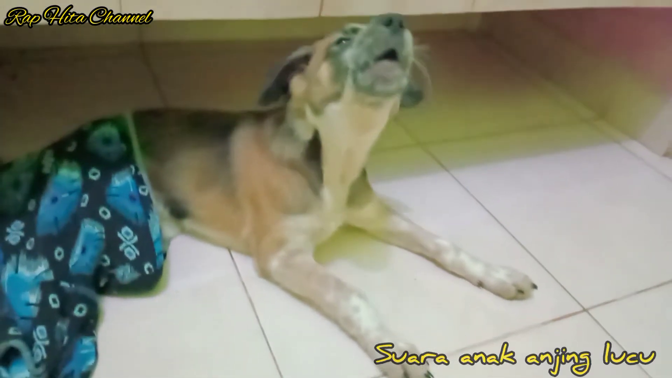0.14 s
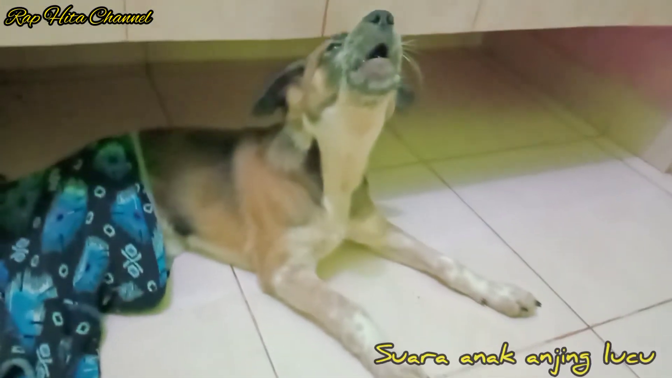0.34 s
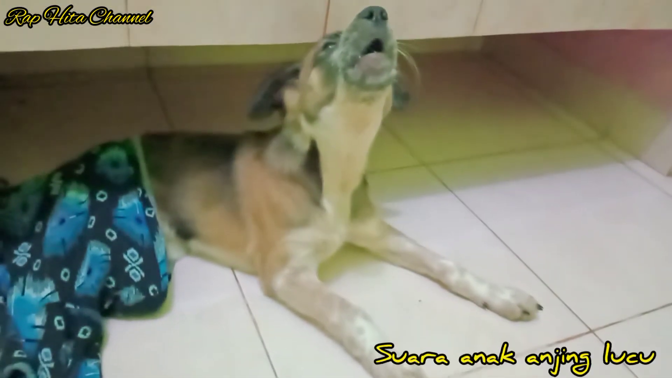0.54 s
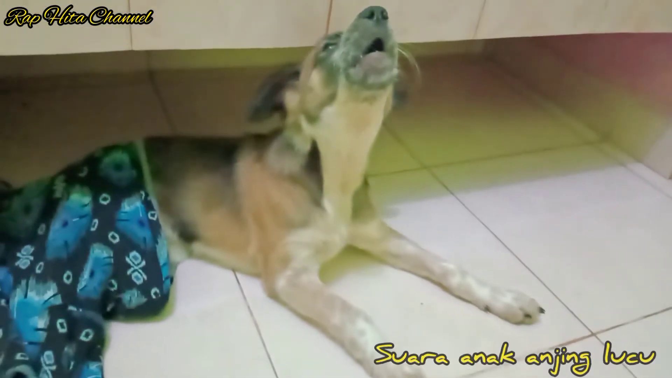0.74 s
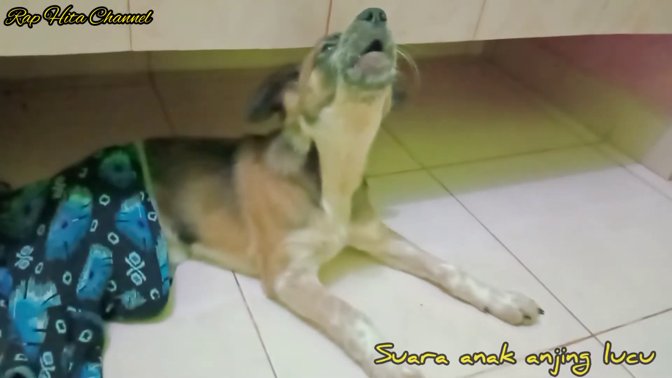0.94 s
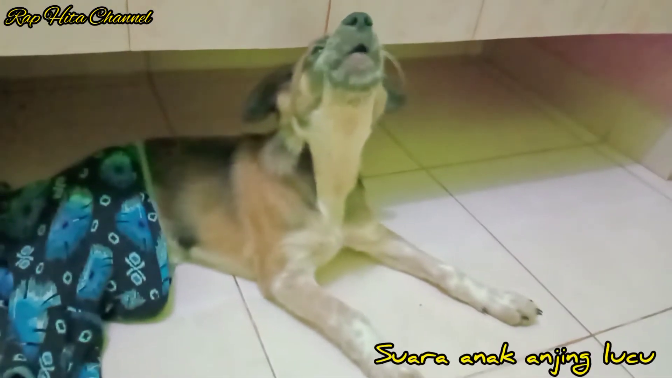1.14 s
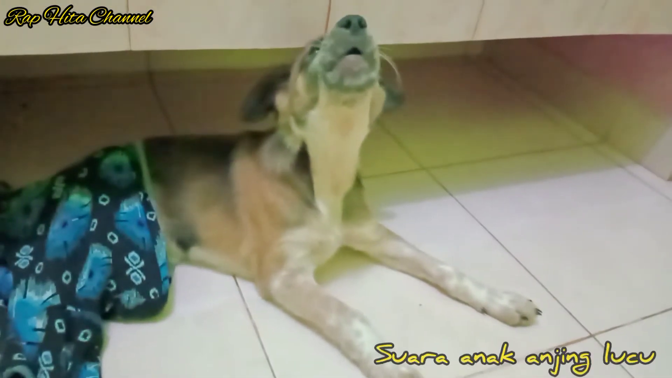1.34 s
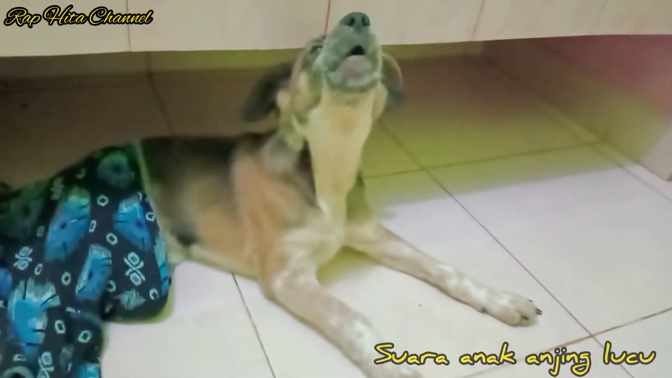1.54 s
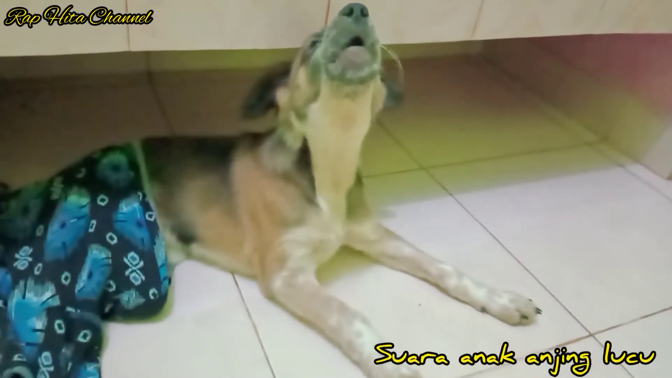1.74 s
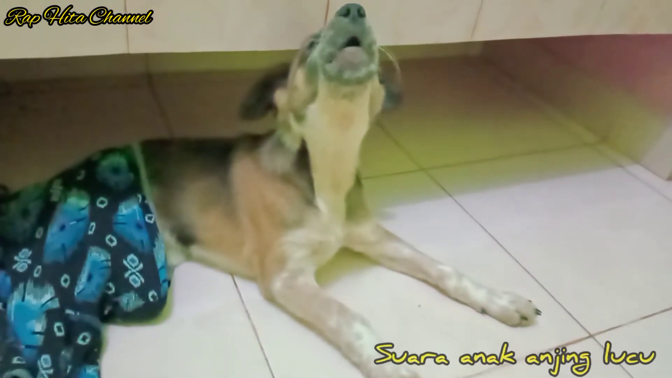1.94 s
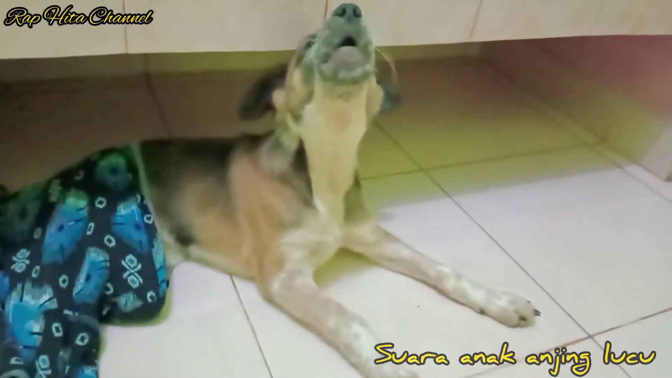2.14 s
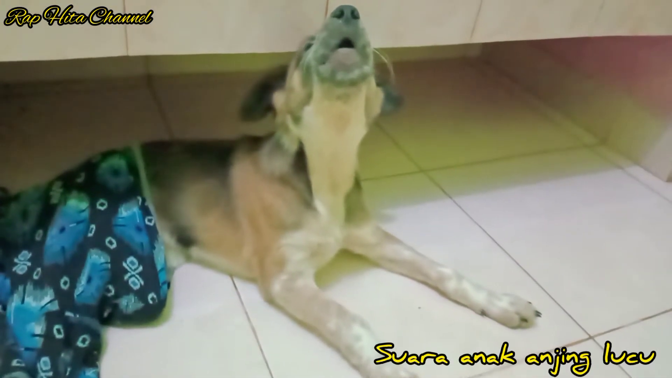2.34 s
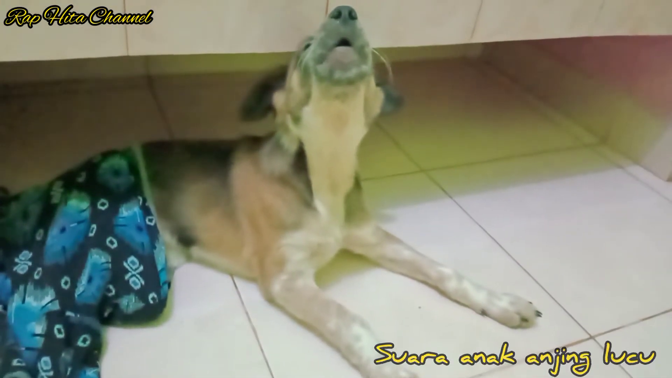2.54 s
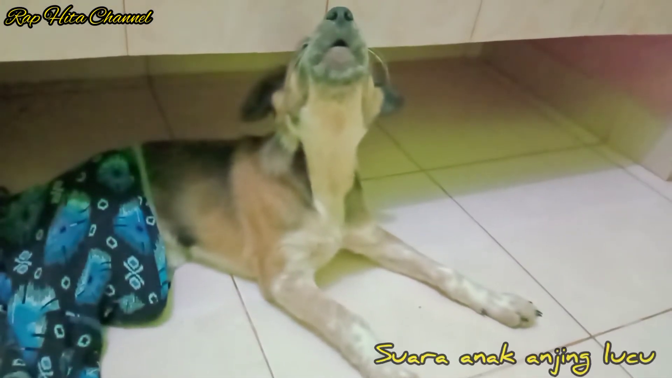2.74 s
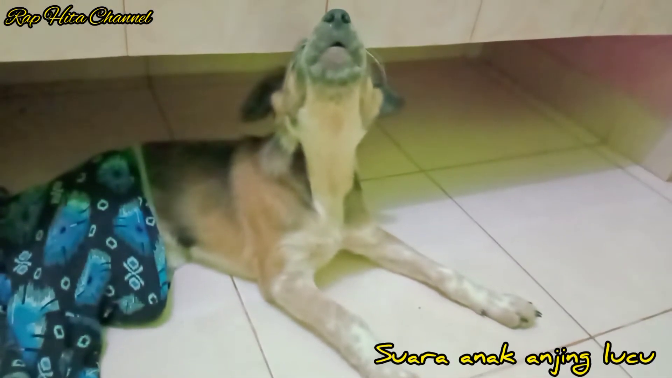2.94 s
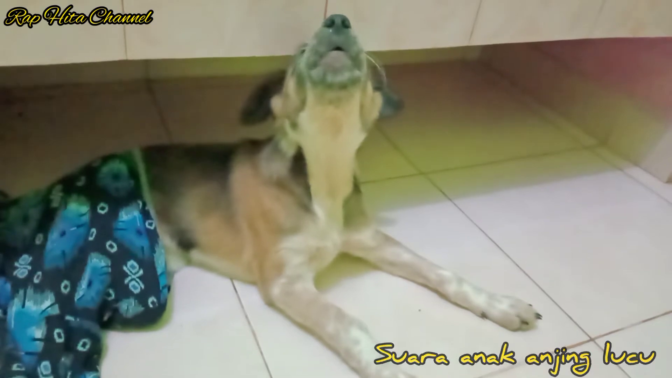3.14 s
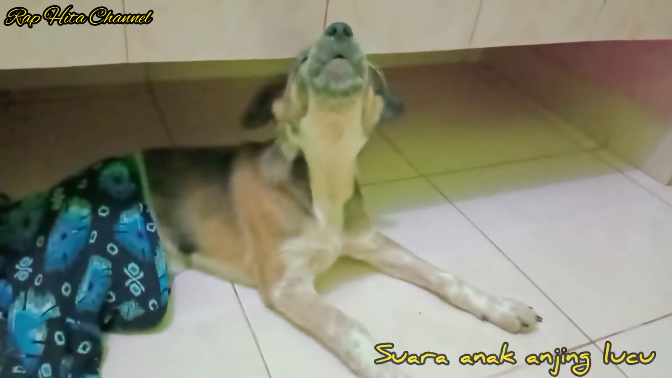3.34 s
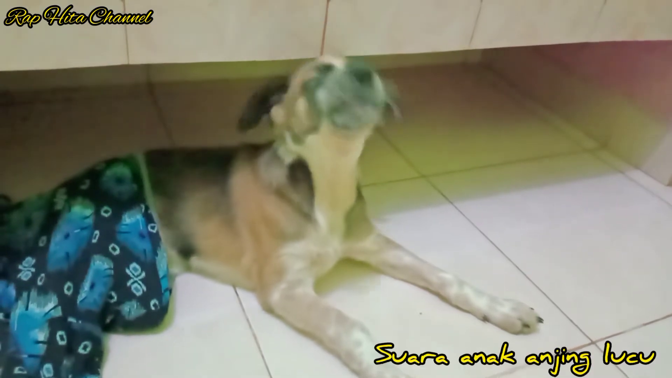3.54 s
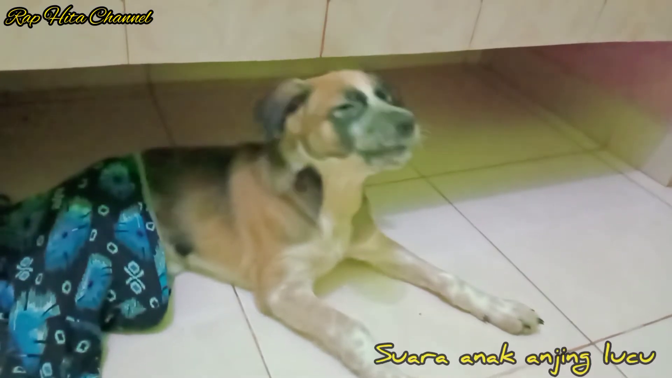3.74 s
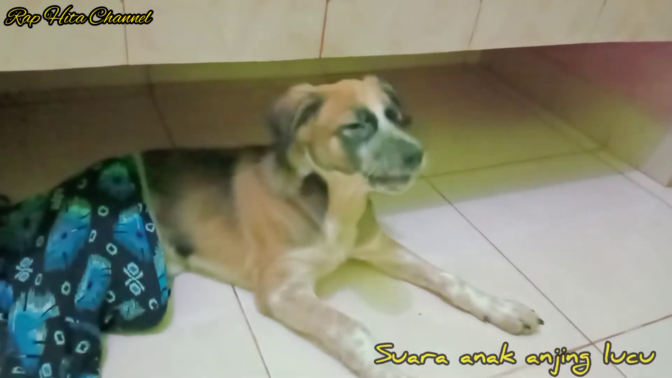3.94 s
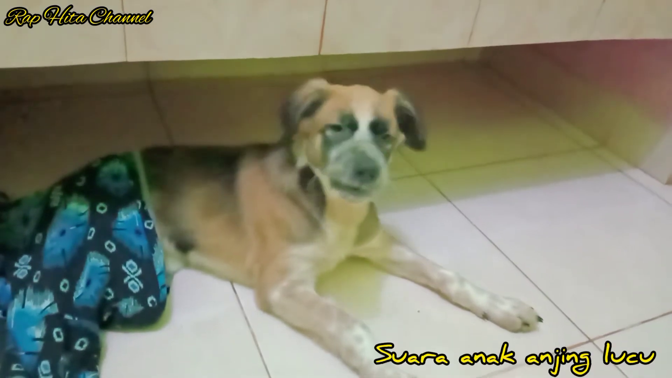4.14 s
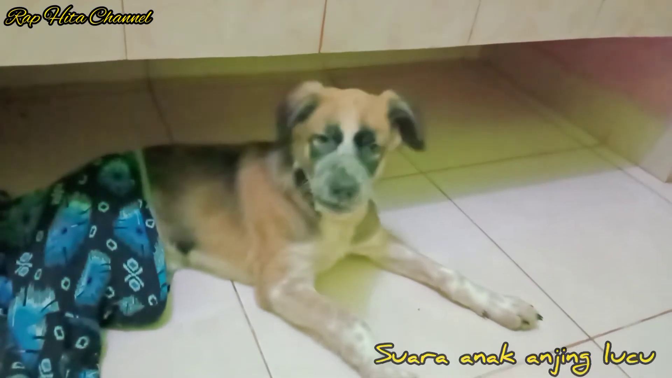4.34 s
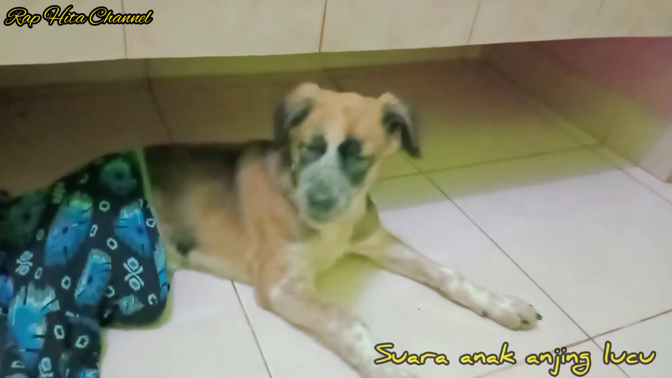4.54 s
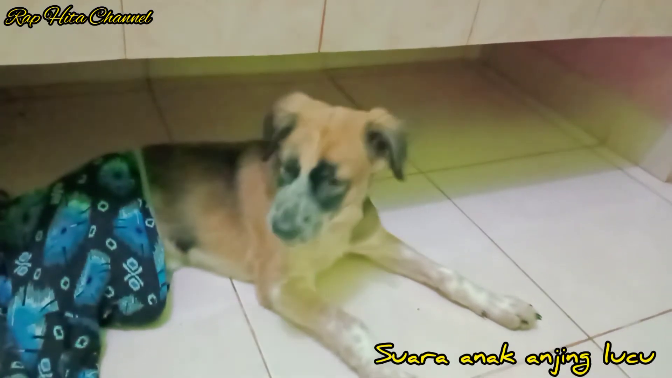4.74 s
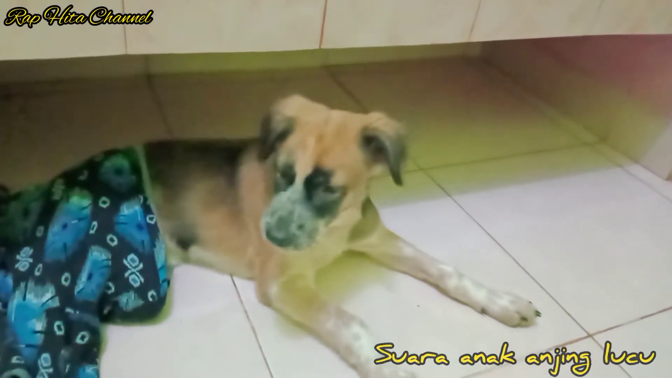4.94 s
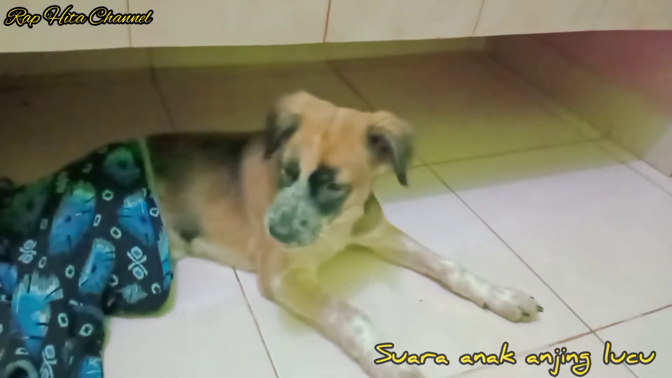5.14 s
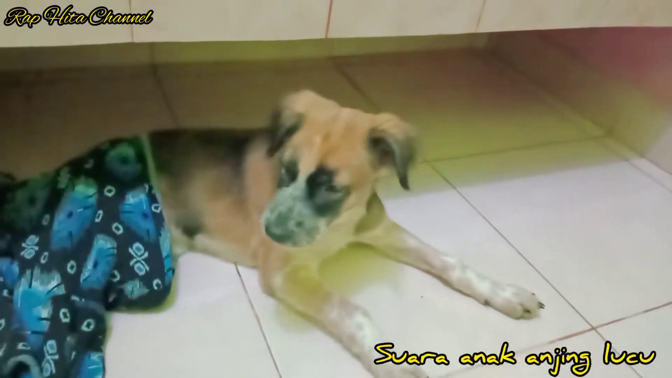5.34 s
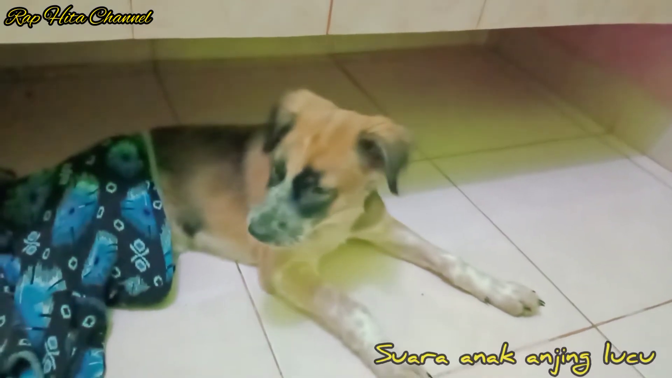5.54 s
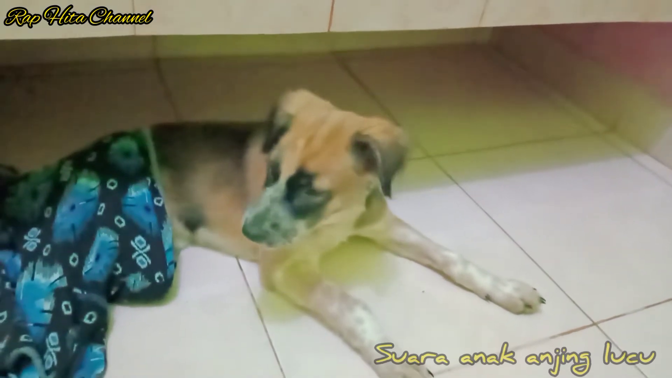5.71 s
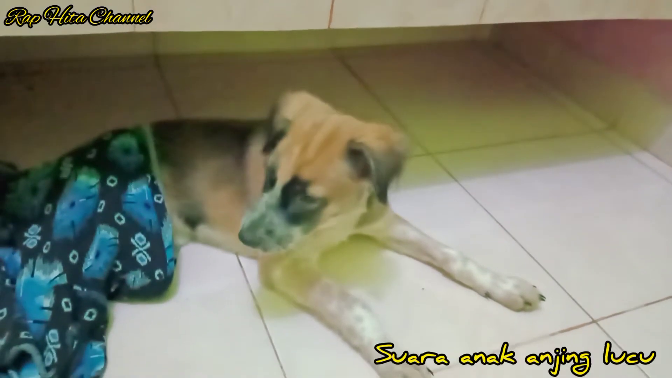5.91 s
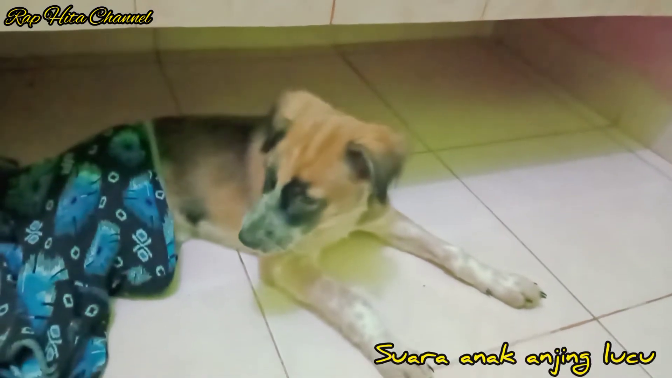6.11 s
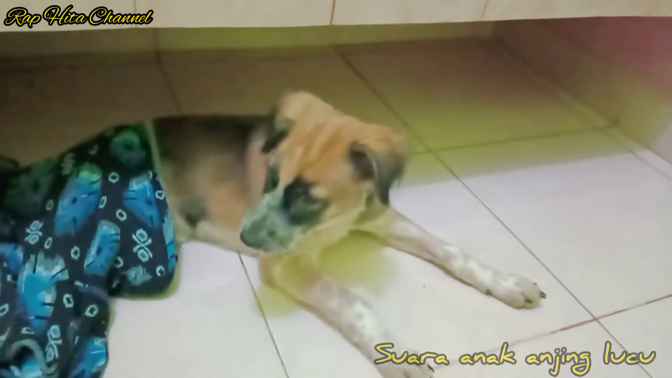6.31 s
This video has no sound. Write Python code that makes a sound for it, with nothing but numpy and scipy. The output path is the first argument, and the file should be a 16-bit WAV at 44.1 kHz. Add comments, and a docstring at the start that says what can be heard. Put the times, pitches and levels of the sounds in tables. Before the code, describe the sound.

A puppy howls close by in a hard tiled room that rings briefly after each cry. The first howl starts at once, high, and falls away by 0.4 seconds. A long second howl begins at about 0.7 seconds, climbs to a peak near 1.1, then sinks in small steps, cracks hoarsely around 2.4 and ends low at 2.8. Four softer nasal whines follow, each falling in pitch and led in by a thin, very high whistle: a wavering one from 3.2 to 3.7 seconds, two short ones at about 4.1 and 4.6, and one from 5.1 to 5.6 with a stronger whistle. At about 5.8 seconds another whistle opens a new high, wavering howl that is still going at 6.4 seconds. A faint fan-like hum, soft room noise and a slight low rumble lie underneath.

```python
"""A puppy howls twice on a tiled floor, gives four falling whines and starts a new howl.
Its vocal folds buzz through the open mouth for the howls and through the nose for the soft whines.
A thin throat whistle leads into each whine and the last howl, and the voice splits it into side tones.
The hard room rings over a faint hum; a gain control pushes the background down under the howls."""
import sys
import numpy as np
from scipy import signal
from scipy.fft import rfft, irfft, next_fast_len
from scipy.io import wavfile
from scipy.ndimage import uniform_filter1d, minimum_filter1d

SR = 44100
rng = np.random.default_rng(int(sys.argv[2]) if len(sys.argv) > 2 else 0)


def generate_wav(signal):
    """Clip the signal to [-1, 1] and save it as 16-bit WAV at the path in sys.argv[1]."""
    frames = np.transpose(np.atleast_2d(signal))
    scaled = np.clip(frames, -1, 1) * 32767
    pcm = np.round(scaled).astype(np.int16)
    wavfile.write(sys.argv[1], SR, pcm)


N = 280917
T = np.arange(N) / SR


def amp(db):
    """Decibels to gain."""
    return 10 ** (np.asarray(db) / 20)


def unit_rms(x):
    """Scales to rms 1."""
    return x / np.sqrt(np.mean(x ** 2) + 1e-20)


def at_hz(points, hz):
    """Reads a table along a logarithmic frequency axis."""
    f, value = np.transpose(points)
    return np.interp(np.log(hz + 1), np.log(f + 1), value)


def curves(rows, t):
    """The columns of a breakpoint table at the given times."""
    times, *columns = np.transpose(rows)
    return [np.interp(t, times, column) for column in columns]


def noise(colour):
    """Noise of rms 1 with the given colour."""
    size = next_fast_len(N)
    gain = amp(at_hz(colour, np.fft.rfftfreq(size, 1 / SR)))
    return unit_rms(irfft(rfft(rng.standard_normal(size)) * gain, size)[:N])


def drift(rate_hz):
    """Smooth random wander of rms 1, up to about the given rate."""
    size = next_fast_len(N // 16)
    hz = np.fft.rfftfreq(size, T[-1] / size)
    slow = irfft(rfft(rng.standard_normal(size)) * np.exp(-(hz / rate_hz) ** 2), size)
    return unit_rms(np.interp(T, np.linspace(0, T[-1], size), slow))


def soft_gate(start, end, rise_s=0.0084, fall_s=0.01):
    """The sample indices between two times and a soft-edged gate over them."""
    at = np.flatnonzero((T >= start) & (T <= end))
    ramp = np.clip(np.minimum((T[at] - start) / rise_s, (end - T[at]) / fall_s), 0, 1)
    return at, np.sin(np.pi / 2 * ramp) ** 2


# Colour of the room tone. Each row: frequency in Hz, relative level in dB.
ROOM_TONE_COLOUR = [(25, -31.5), (50, -22), (90, -10), (160, 0.5), (280, -2.5), (450, -5), (1000, -6.5),
                    (2000, -12.5), (3400, -16), (4300, -27.5), (5300, -41.5), (8000, -46), (15000, -54)]


def room_tone(level_db=-46.5):
    """A soft, dark bed of steady noise."""
    return amp(level_db) * noise(ROOM_TONE_COLOUR)


# Colour of the rumble. Each row: frequency in Hz, relative level in dB.
RUMBLE_COLOUR = [(20, -11.5), (42, -4), (60, -11), (80, 7), (130, -19), (300, -38.5), (1000, -76)]
# Its fade-in. Each row: time in seconds, level in dB.
RUMBLE_FADE = [(0, -85), (1.8, -68), (2.5, -64), (6.37, -61.5)]


def house_rumble(swell_db=4.5):
    """The low rumble of the house creeps in with lumpy swells."""
    return amp(curves(RUMBLE_FADE, T)[0] + swell_db * drift(8)) * noise(RUMBLE_COLOUR)


# Partials of the hum. Each row: frequency in Hz, rms level in dB.
HUM_PARTIALS = [(100, -66.5), (149, -60.5), (248, -53), (300, -56), (395, -72.5)]


def hum(waver_db=1.5):
    """A faint hum, as of a fan; each partial wavers in level and phase."""
    return np.sqrt(2) * sum(amp(db + waver_db * drift(6.5)) * np.sin(2 * np.pi * hz * T + .5 * drift(11))
                            for hz, db in HUM_PARTIALS)


# Slaps off floor and walls. Each row: delay in seconds, level in dB against the direct sound.
EARLY_REFLECTIONS = [(.0034, -22.5), (.0112, -14.5), (.0187, -14), (.0265, -13)]
# Ring of the room. Each row: frequency in Hz, seconds to die by 60 dB.
RING_TIMES = [(250, .8), (600, 0.67), (1800, 0.75), (3500, 0.62), (7000, 0.6), (14000, 0.25)]


def tiled_room(x, tail_db=-5.5, predelay_s=0.0097):
    """Direct sound, a few hard reflections, then a dense tail that dies band by band."""
    slots = np.arange(0, SR - 12, 12)  # one echo of random sign somewhere in each slot
    echoes = np.zeros(SR)
    echoes[slots + rng.integers(0, 12, len(slots))] = rng.choice([-1., 1.], len(slots))
    hz, t, bands = signal.stft(echoes * (T[:SR] > predelay_s), SR, nperseg=256)
    decay = amp(-60 * t / at_hz(RING_TIMES, hz)[:, None])
    tail = signal.istft(bands * decay, SR, nperseg=256)[1]
    response = amp(tail_db) * tail / np.linalg.norm(tail)
    response[0] += 1
    for delay, db in EARLY_REFLECTIONS:
        response[round(delay * SR)] += amp(db)
    return signal.fftconvolve(x, response)[:N]


# Colour of the rasp. Each row: frequency in Hz, relative level in dB.
RASP_COLOUR = [(500, -15.5), (1700, -4.5), (2650, 0.5), (3500, 7.5), (4500, -17), (5900, -38.5),
               (8200, -14.5), (9900, -23), (12300, -16), (15000, -26.5)]


def rasp(voice, folds, clear_db=-48, hoarse_boost_db=20, pulsing=0.53):
    """Turbulence at the folds rides the voice's level, pulses at its pitch and grows with hoarseness."""
    envelope = np.sqrt(abs(uniform_filter1d(voice ** 2, size=400)))
    _, hoarse = opening_and_hoarseness(T)
    gain = amp(clear_db + hoarse_boost_db * hoarse) * envelope
    return gain * (1 + pulsing * folds.real) * noise(RASP_COLOUR)


# Side tones of the whistle, then of its octave.
# Each row: offset in multiples of the voice pitch, relative level in dB.
WHISTLE_SIDEBANDS = [(-1, -13), (1, 9.5), (2, -2.5), (3, -14)]
OCTAVE_SIDEBANDS = [(-4, -15.5), (-3, -22), (-2, -14.5), (-1, -17.5), (1, -14.5), (2, -19.5), (3, -21)]


def side_tones(swing):
    """The folds' swing modulates the whistle and its octave: one modulator for each."""
    return [abs(swing) * sum(amp(db) * np.exp(1j * round(k) * np.angle(swing)) for k, db in table)
            for table in (WHISTLE_SIDEBANDS, OCTAVE_SIDEBANDS)]


# Colour of the air around the whistle. Each row: frequency in Hz, relative level in dB.
AIR_COLOUR = [(1500, 5), (3400, 20), (4500, 13), (5500, -15), (6800, 5.5), (8200, 5), (9300, -11),
              (11000, -2.5), (12500, 2), (15500, -16.5)]
# Narrow resonance that the octave meets. Each row: frequency in Hz, level in dB against the whistle.
OCTAVE_RESONANCE = [(11600, -25), (12100, -3), (12500, -29.5), (12900, -29.5), (14000, -55)]
# Whistle cues. Each row: start, crest and end in seconds, pitch in Hz, arch as a share of the pitch,
# relative crest level in dB, swell in dB, fade in dB per second, relative side-tone and air levels in dB.
WHISTLE_CUES = [(3.18, 3.255, 3.68, 6214, 0.021, -44.5, 19, 50, -59, -57),
                (4.064, 4.156, 4.24, 6030, 0.017, -49.5, 6, 400, -73, -61),
                (4.546, 4.63, 4.88, 6010, 0.0096, -48.5, 7.5, 257, -77.5, -60.5),
                (5.074, 5.159, 5.41, 6383, 0.036, -29.5, 18.5, 163, -55.5, -69.5),
                (5.746, 5.776, 6, 6553, 0.07, -35, -4.5, 98, -52.5, -62)]


def throat_whistle(cue, folds, tone_trim_db=2.5, side_trim_db=-3.5, air_trim_db=14.5, unsteady_db=5.0,
                   scoop=0.021, scoop_s=.014, arch_s=0.017, waver=0.0034, jitter=0.0057, air_db_per_s=30):
    """A second, very high oscillator scoops up, arches over its crest and fades as its air thins out."""
    start, crest, end, pitch_hz, arch, crest_db, swell_db, fade_db_per_s, side_db, air_db = cue
    at, gate = soft_gate(start, end, fall_s=0.047)
    t, swing = T[at], folds[at]
    below_crest_db = swell_db * np.maximum(crest - t, 0) / (crest - start)
    below_crest_db += fade_db_per_s * np.maximum(t - crest, 0)
    level = amp(crest_db + tone_trim_db - below_crest_db + unsteady_db * drift(25)[at])
    bend = 1 - scoop * np.exp((start - t) / scoop_s) + arch * np.exp(-((t - crest) / arch_s) ** 2)
    hz = pitch_hz * bend * (1 + waver * drift(49)[at] + jitter * drift(720)[at])
    carrier = np.exp(2j * np.pi * np.cumsum(hz) / SR)
    depth = amp(side_db + side_trim_db)
    tone_sides, octave_sides = side_tones(swing)
    tone = carrier * (level + depth * tone_sides)
    octave = carrier ** 2 * (level * amp(at_hz(OCTAVE_RESONANCE, 2 * hz)) + depth * octave_sides)
    air_level = amp(air_db + air_trim_db - air_db_per_s * (t - start))
    hiss = air_level * noise(AIR_COLOUR)[at] * (1 + 0.29 * swing.real)
    return at, gate * (np.sqrt(2) * (tone + octave).real + hiss)


# Movement of the mouth. Each row: time in seconds, opening from 0 (shut) to 1 (wide).
MOUTH_OPENING = [(0, 1), (.37, 0.93), (.74, 0.88), (1.1, 0.96), (1.9, 1), (2.27, 0.94), (2.5, 0.64),
                 (2.8, 0.33), (3.2, 0.01), (5.56, 0.1), (5.78, 0), (5.9, 0.51), (6.12, 0.75), (6.25, 0.64),
                 (6.37, 1)]
# One crack as the long howl drops to its low ending: time and half length in seconds, added hoarseness.
VOICE_CRACK = (2.37, 0.13, 1)


def opening_and_hoarseness(t, hoarse_open=0.26, hoarse_shut=.36):
    """The wider the mouth, the clearer the voice, except where it cracks; both run from 0 to 1."""
    opening = np.clip(curves(MOUTH_OPENING, t)[0], 0, 1)
    crack_s, width_s, added = VOICE_CRACK
    crack = added * np.exp(-((t - crack_s) / width_s) ** 2)
    hoarse = hoarse_shut + (hoarse_open - hoarse_shut) * opening + crack
    return opening, np.clip(hoarse, 0, 1)


# The long howl steps down through small register breaks.
# Each row: time in seconds, drop as a share of the pitch, flash of the low overtones in dB.
REGISTER_BREAKS = [(1.306, 0.041, 5.5), (1.575, .025, 5), (1.872, 0.013, 13), (2.292, .04, -5.5)]


def register_breaks(t, cling_s=.035, flash_s=.06):
    """The pitch clings on before each break, drops and recovers; the overtone flash dies away."""
    step = sum(drop * np.sign(s - t) * np.exp(-abs(t - s) / cling_s) for s, drop, _ in REGISTER_BREAKS)
    flash_db = sum(db * (t > s) * np.exp(-abs(t - s) / flash_s) for s, _, db in REGISTER_BREAKS)
    return 1 + step / 2, uniform_filter1d(flash_db, size=200)


# Colour of the voice through the open mouth, then through the nose.
# Each row: frequency in Hz, relative level in dB.
MOUTH_COLOUR = [(1000, 7.5), (1350, 9.5), (1600, 8), (1800, 10.5), (2130, 16), (2400, -5.5), (2620, 2),
                (2900, -1), (3350, 2), (4050, -26), (4650, -15.5), (5200, -23.5), (5900, -44), (7000, -23),
                (8150, -5.5), (10000, -22), (11600, -4.5), (13200, -3), (15500, -13)]
NOSE_COLOUR = [(600, 5.5), (1150, 10), (1800, -19), (2250, -15), (2670, -1), (3100, -3.5), (3500, -8.5),
               (4000, -14), (4600, -20.5), (5800, -44.5), (8400, -25), (10400, -38.5), (13000, -30),
               (15500, -34)]


def overtones(at, hz, phase, opening, low_db, high_db, rolloff_db=3.65, flutter_db=4.0,
              mouth_edge_hz=2350, blend_hz=300, treble_hz=3600, treble_blend_hz=800,
              sheen_db=0.5, sheen_db_per_octave=13, easy_pitch_hz=780):
    """The folds' harmonic stack, coloured by mouth and nose, with a level each side of the mouth edge."""
    k = np.arange(2, 29)[:, None]
    partial_hz = k * hz
    colour_db = opening * at_hz(MOUTH_COLOUR, partial_hz) + (1 - opening) * at_hz(NOSE_COLOUR, partial_hz)
    # the folds never close twice alike, so each overtone flutters on its own
    flutter = drift(30)[(at + rng.integers(0, N, k.shape)) % N]
    colour = amp(colour_db - rolloff_db * k + flutter_db * flutter) * (partial_hz < SR / 2)
    low_share = np.clip(.5 + (mouth_edge_hz - partial_hz) / blend_hz, 0, 1)
    gains = 0
    for share, db in ((low_share, low_db), (1 - low_share, high_db)):
        band = colour * share
        gains = gains + amp(db) * band / np.sqrt((band ** 2).sum(0) + 1e-9)
    # the higher a full howl climbs, the more sharply the folds snap shut and the more treble they add
    snap_db = opening * (sheen_db + sheen_db_per_octave * np.log2(hz / easy_pitch_hz))
    gains = gains * amp(snap_db * np.clip((partial_hz - treble_hz) / treble_blend_hz, 0, 1))
    return (gains * np.cos(k * phase + rng.uniform(0, 2 * np.pi, k.shape))).sum(0)


def cry(melody, levels, waver=0.0013, jitter=0.0015, hoarse_jitter=.009, shimmer_db=1.5,
        fundamental_trim_db=-0.5, low_trim_db=-2.5, high_trim_db=-1.0, open_gain_db=10.5):
    """The vocal folds sing one howl or whine; gives its sample indices, its sound and the folds' swing."""
    at, gate = soft_gate(melody[0][0], melody[-1][0])
    t = T[at]
    fundamental_db, low_db, high_db = curves(levels, t)
    opening, hoarse = opening_and_hoarseness(t)
    break_bend, flash_db = register_breaks(t)
    # hoarseness shakes the pitch, which smears the high overtones far more than the fundamental
    shake = 1 + waver * drift(22)[at] + (jitter + hoarse_jitter * hoarse) * drift(220)[at]
    hz = curves(melody, t)[0] * break_bend * shake
    phase = 2 * np.pi * np.cumsum(hz) / SR
    fundamental = amp(fundamental_db + fundamental_trim_db) * np.cos(phase)
    stack = overtones(at, hz, phase, opening, low_db + flash_db + low_trim_db, high_db + high_trim_db)
    wave = fundamental + stack * amp(shimmer_db * drift(170)[at])
    # a wide open mouth radiates the whole voice more strongly
    radiation = amp(open_gain_db * opening ** 2)
    return at, np.sqrt(2) * gate * radiation * wave, gate * np.exp(1j * phase)


# Melodies, one table a cry. Each row: time in seconds, pitch in Hz.
HOWL_MELODIES = [
    [(0.0, 1042), (0.032, 1042), (0.094, 988), (0.246, 853), (0.3, 705), (0.366, 680)],
    [(0.74, 628), (0.78, 768.7), (0.91, 877.6), (0.94, 972.6), (1.1, 1022), (1.3, 977.4), (1.32, 951.4),
     (1.53, 915.3), (1.61, 847.4), (1.72, 810.5), (1.86, 739.3), (1.88, 712.2), (2.08, 643.9),
     (2.16, 645.3), (2.24, 633.4), (2.34, 563.5), (2.36, 527.6), (2.44, 500), (2.6, 527.7), (2.78, 528.2)],
    [(5.758, 1000), (5.794, 1119), (5.83, 1035), (5.86, 781.7), (5.934, 862), (5.956, 930.5), (6.05, 855),
     (6.078, 944), (6.114, 1004), (6.2, 1097), (6.266, 948), (6.369, 919)],
]
WHINE_MELODIES = [
    [(3.228, 852), (3.308, 702.4), (3.374, 722), (3.436, 809.4), (3.566, 711), (3.63, 622), (3.726, 561)],
    [(4.145, 726), (4.283, 511.4), (4.297, 432), (4.312, 335.6)],
    [(4.618, 845), (4.666, 637), (4.696, 560.3), (4.786, 546.6), (4.832, 435), (4.872, 295.4)],
    [(5.168, 928), (5.212, 878), (5.354, 892.4), (5.482, 646), (5.508, 542.4), (5.56, 324)],
]
# Dynamics, one table a cry. Each row: time in seconds, then relative levels in dB of the fundamental,
# the overtones under the mouth resonance and those above it.
HOWL_DYNAMICS = [
    [(0.012, -5.5, -25.5, -29), (0.024, -13, -38.5, -69), (0.12, -19, -26.5, -43), (0.162, -15, -18, -44.5),
     (0.338, -14.5, -33.5, -45.5), (0.366, -24, -34, -47.5)],
    [(0.75, -15, -25.5, -60.5), (0.762, -13.5, -33, -54.5), (0.826, -16.5, -26, -37.5),
     (0.898, -12, -9, -45), (0.946, -19, -25, -36), (1.106, -12.5, -30, -42), (1.366, -17.5, -16.5, -46),
     (1.46, -12, -17.5, -39.5), (1.508, -16, -24.5, -44), (1.606, -17.5, -32, -35.5),
     (1.844, -12.5, -28.5, -42), (2.02, -16, -26.5, -31), (2.088, -13, -22.5, -29), (2.126, -26, -31, -33),
     (2.19, -13.5, -23, -33.5), (2.28, -16.5, -29.5, -35.5)] + [(2.32, -27, -22, -32.5),
     (2.518, -20, -35.5, -32), (2.568, -21.5, -18.5, -35.5), (2.712, -14, -36.5, -31.5),
     (2.8, -31.5, -23.5, -47.5)],
    [(5.762, -31, -27.5, -30), (5.782, -17.5, -17.5, -19.5), (5.82, -29.5, -37, -67),
     (5.834, -31, -36, -42), (5.894, -33, -40.5, -39), (6.12, -34.5, -44.5, -42),
     (6.168, -18.5, -25, -25.5), (6.194, -15, -14.5, -40.5), (6.36, -17.5, -25.5, -43)],
]
WHINE_DYNAMICS = [
    [(3.228, -26, -72, -57.5), (3.244, -19.5, -32, -33), (3.256, -11.5, -48, -45),
     (3.344, -27, -29.5, -36.5), (3.364, -22, -37, -39.5), (3.456, -11.5, -42, -41),
     (3.652, -29.5, -25.5, -32.5), (3.714, -22.5, -24.5, -43), (3.738, -36, -9, -42)],
    [(4.147, -24, -31, -56), (4.179, -29, -37, -32), (4.263, -24, -23, -42), (4.312, -24, -55, -52)],
    [(4.62, -28, -29.5, -32), (4.638, -20.5, -27, -35), (4.676, -23.5, -41, -38.5),
     (4.792, -24.5, -30.5, -32.5), (4.84, -13, -41, -56), (4.872, -34, -40, -46)],
    [(5.17, -33, -64, -54), (5.198, -38.5, -52, -41.5), (5.27, -21.5, -55.5, -41), (5.436, -33, -43.5, -40),
     (5.498, -20.5, -46.5, -36.5), (5.56, -30.5, -36, -49)],
]


def puppy():
    """Howls and whines, layered with the whistles and the rasp that their vibrating folds modulate."""
    voice, whistles, folds = np.zeros(N), np.zeros(N), np.zeros(N, complex)
    for melody, levels in zip(HOWL_MELODIES + WHINE_MELODIES, HOWL_DYNAMICS + WHINE_DYNAMICS):
        at, sound, swing = cry(melody, levels)
        voice[at] += sound
        folds[at] = swing
    for cue in WHISTLE_CUES:
        at, sound = throat_whistle(cue, folds)
        whistles[at] += sound
    return voice + whistles + rasp(voice, folds)


def scene():
    """The puppy in its ringing room over a quiet bed, in mono."""
    return (tiled_room(puppy()) + hum() + house_rumble() + room_tone())[None]


def record(dry, ceiling_db=-5.5, recovery_db_per_s=15, step_db=1.5, lowpass_hz=15500):
    """Gain control ducks at once when a peak nears the ceiling and recovers slowly; then a low-pass."""
    peak_db = 20 * np.log10(-minimum_filter1d(-abs(dry[0]), size=60) + 1e-9)
    recovery_db = recovery_db_per_s * T
    held_db = step_db * np.ceil(np.maximum.accumulate(peak_db + recovery_db) / step_db)
    duck_db = np.maximum(held_db - recovery_db - ceiling_db, 0)
    ducked = dry * amp(-uniform_filter1d(uniform_filter1d(duck_db, size=30), size=30))
    lowpass = signal.firwin(511, lowpass_hz, window=("kaiser", 9), fs=SR)
    return signal.oaconvolve(ducked, lowpass[None], "same")


dry = scene()
out = record(dry)
generate_wav(out)
```